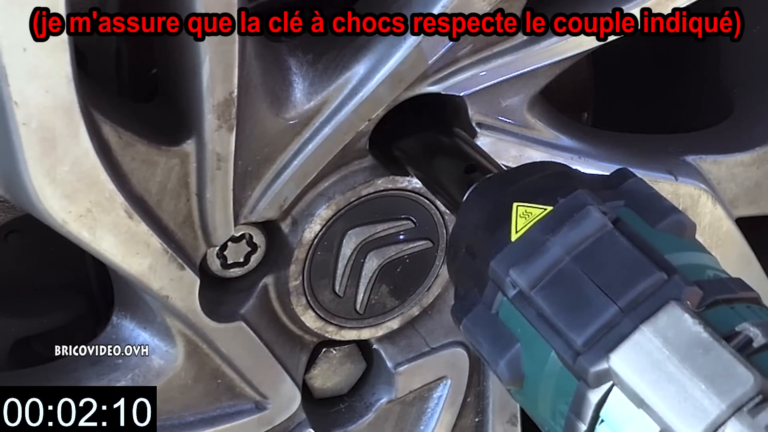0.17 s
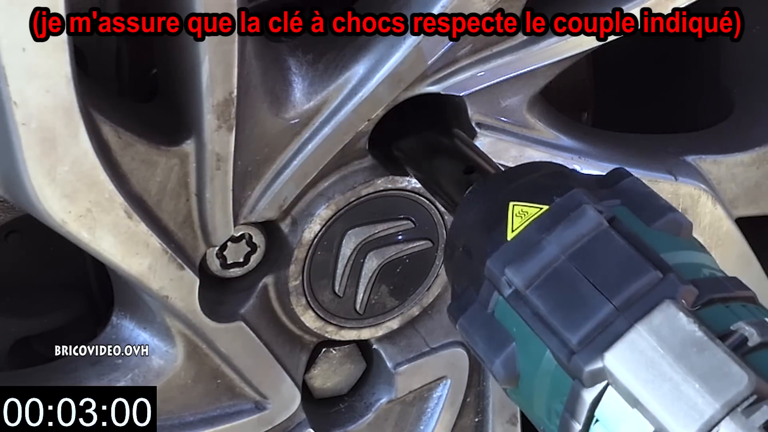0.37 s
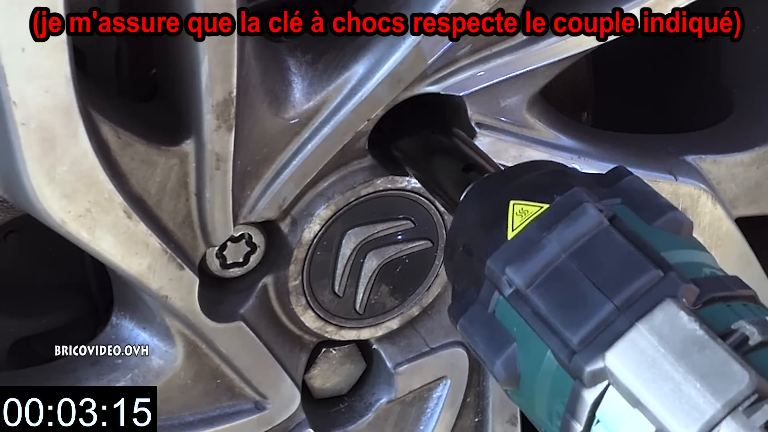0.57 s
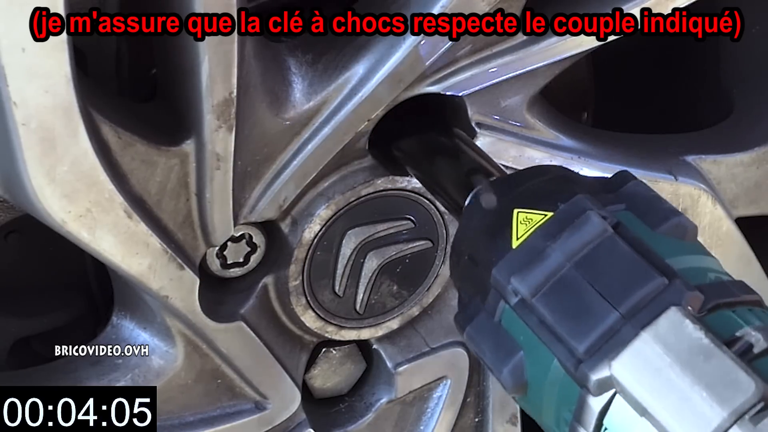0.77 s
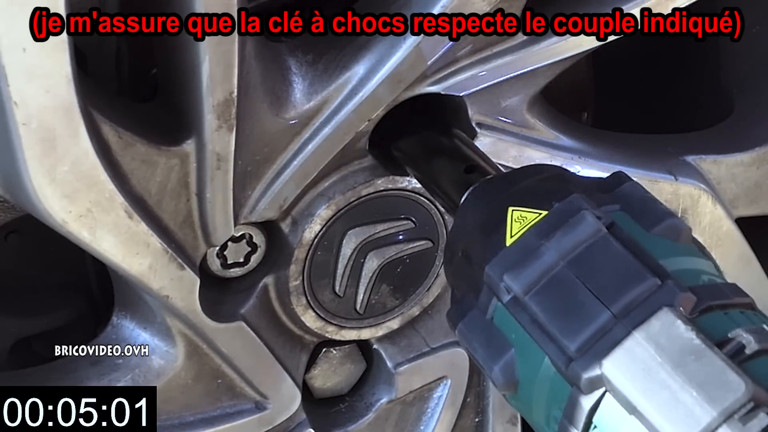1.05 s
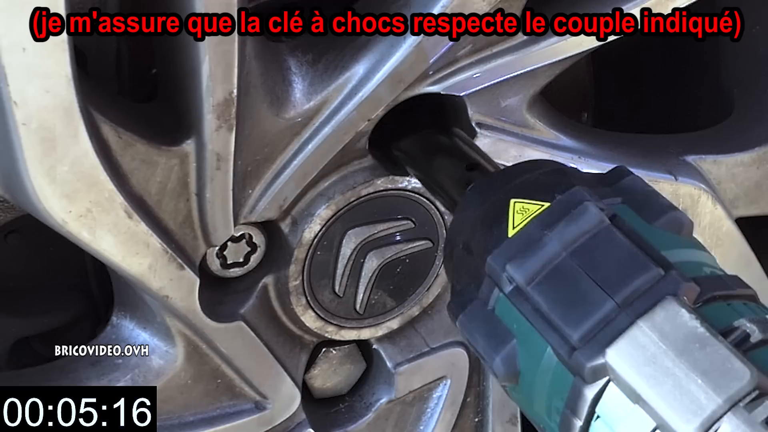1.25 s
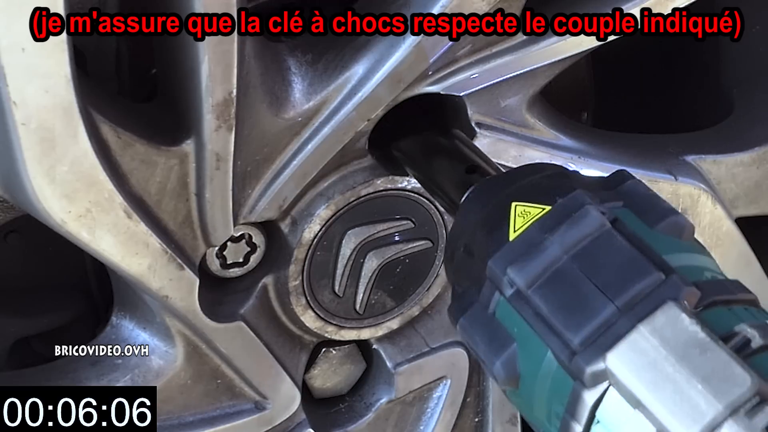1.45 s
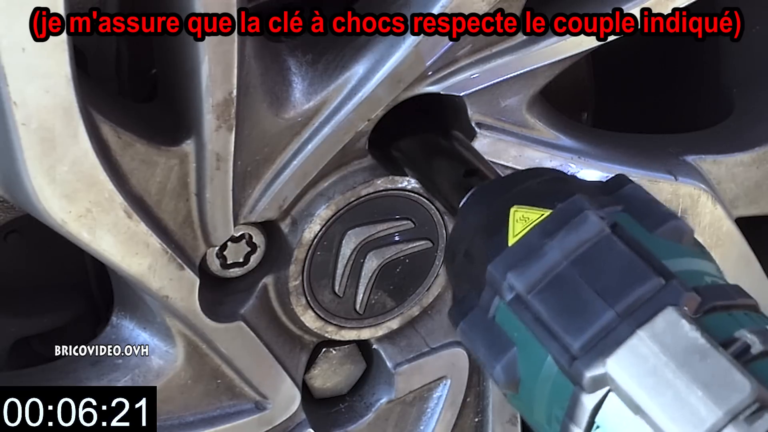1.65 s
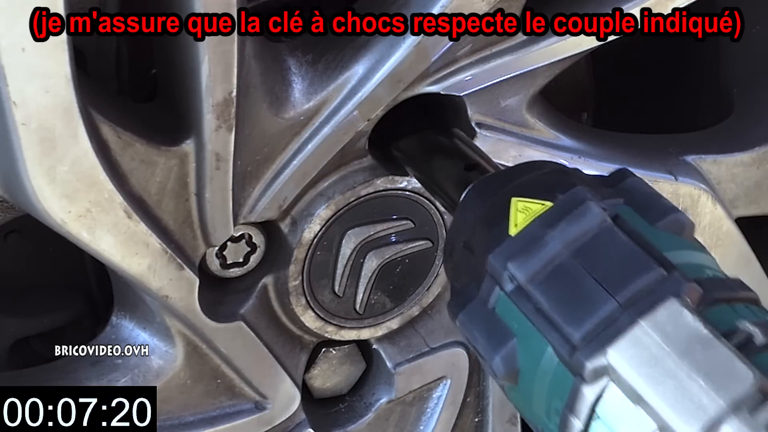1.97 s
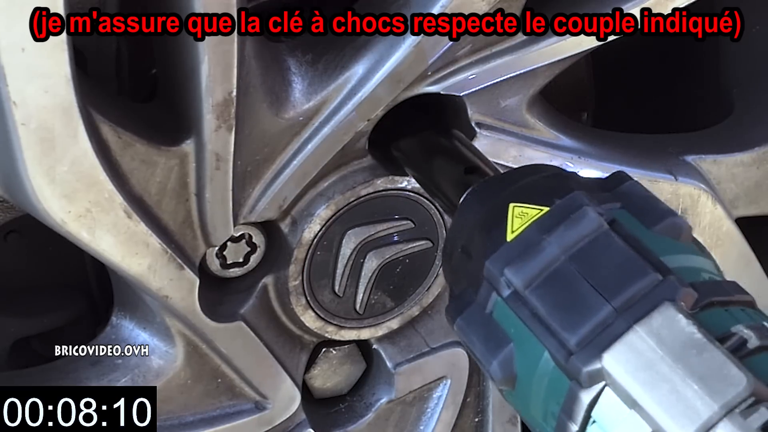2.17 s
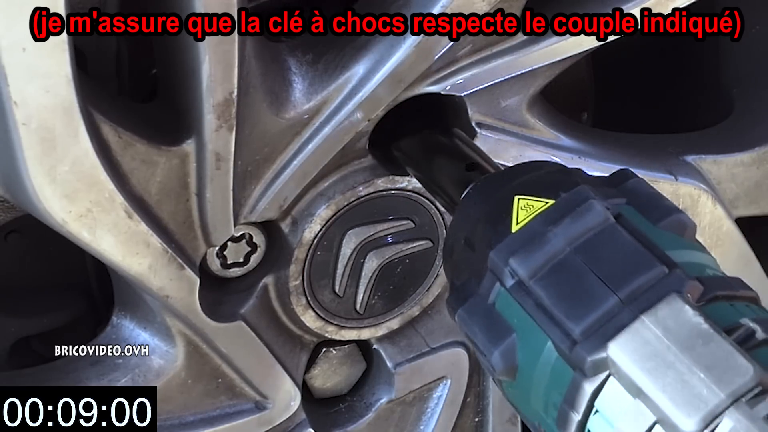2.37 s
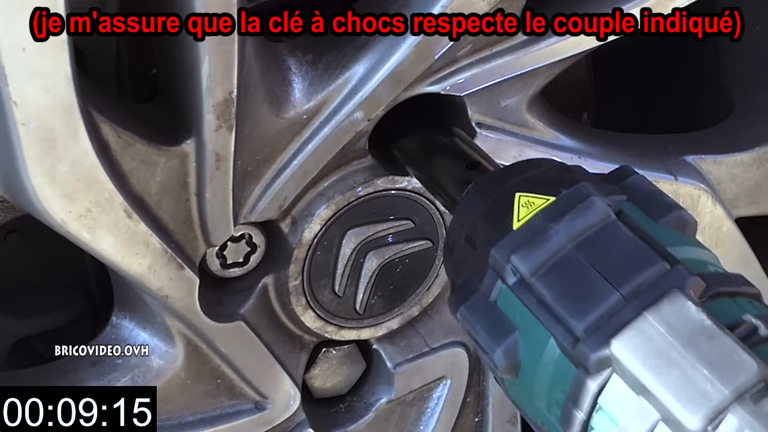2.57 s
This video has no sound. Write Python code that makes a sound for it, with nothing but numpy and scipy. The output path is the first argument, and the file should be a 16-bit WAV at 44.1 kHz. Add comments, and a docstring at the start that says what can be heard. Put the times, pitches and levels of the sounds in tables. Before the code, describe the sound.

An impact wrench tightens a nut on an alloy wheel, heard up close. Its rapid steel blows crack and ring continuously over a faint hum from the tool, easing a little, then holding steady, with brief reflections from nearby walls.

```python
"""A hard metallic rattle, about 61 blows a second: a cordless impact wrench on the lug nut of an alloy wheel,
close to the microphones. Every hammer cycle is four steel-on-steel contacts: each cracks, rings the
socket and wheel, and rattles the housing. Underneath, the wheel shudders and the tool's body hums.
The blows soften over the first second; nearby walls add a short wash over faint background air."""
import sys
import numpy as np
from scipy import signal
from scipy.fft import rfft, irfft, next_fast_len
from scipy.io import wavfile

SR = 44100
rng = np.random.default_rng(int(sys.argv[2]) if len(sys.argv) > 2 else 0)


def materialize(psi):
    """Save the field psi as 16-bit PCM at rate SR to the path in sys.argv[1].

    A 1-D psi becomes a single channel; in a 2-D psi each row is a channel.
    """
    bounded = np.clip(np.atleast_2d(psi).T, -1, 1)
    quanta = np.round(bounded * 32767).astype(np.int16)
    wavfile.write(sys.argv[1], SR, quanta)


N = 119070

# the four contacts of a hammer cycle (delay from the main blow [ms], level [dB], scatter [dB],
# share of the force changes [ratio], clank [dB], bright edge [dB], housing [dB])
CONTACT_PATTERN = [(-4.85, -4.9, 2.2, .8, -2.5, -3.5, -7), (-2.7, -1.2, 1.7, 1.1, 2.5, 0, -1),
                   (.55, -.3, 1.9, 1.1, -2, .5, 0), (5.17, -3.8, 1.7, .45, -1.5, -1.5, -1.5)]
JITTER_MS, LOOSEN_PER_S = .13, .35  # the timing of the contacts loosens as the nut seats


def hammer(start_turns=-.41, cycle_jitter_ms=.09, uneven_ms=.28, uneven_db=.7):
    """The spinning hammer strikes: time [s], force [dB] per cycle; time, level, clank per contact."""
    # hammer speed (time [s], rate [blows per second])
    speed = [(0.0, 60.67), (0.3, 61.22), (0.5, 60.49), (0.8, 61.25), (1.1, 61.48), (1.28, 61.92),
             (1.5, 61.17), (1.9, 61.58), (2.15, 61.23), (2.5, 61.82), (2.7, 62.27)]
    # force of the hammering (time [s], level [dB])
    force_curve = [(0, -26.1), (.5, -26.3), (.72, -27.5), (.9, -28.1), (1.15, -29.7), (1.55, -28.8),
                   (1.95, -29.9), (2.1, -29.4), (2.3, -30.6), (2.48, -29.3), (2.7, -30)]
    # blows that land squarely (time [s], extra level [dB], clank [dB])
    square_blows = [(.0902, 7, -3), (.169, 2, 6), (.2665, 2, 3.5), (.3192, 5, -3), (.8279, 4, -2),
                    (.9098, 4, -2), (1.2188, 4, -3), (1.462, 4, -6), (1.7394, 2.5, -3), (2.0647, 4, -3),
                    (2.0972, 4.5, -2), (2.1299, 4.5, -3), (2.2282, 3.5, -3), (2.3741, 2.3, -2)]
    t = np.arange(N) / SR
    turns = start_turns + np.cumsum(np.interp(t, *np.transpose(speed))) / SR
    cycle = np.arange(int(turns[-1]) + 1)
    chance = rng.standard_normal((len(cycle), 9))
    blow = np.interp(cycle, turns, t) + cycle_jitter_ms * chance[:, 0] / 1000
    force = np.interp(blow, *np.transpose(force_curve))
    delay_ms, db, scatter_db, share, clank_db, _, _ = np.transpose(CONTACT_PATTERN)
    late_ms = delay_ms + JITTER_MS * (1 + LOOSEN_PER_S * blow[:, None]) * chance[:, 1:5]
    scatter = scatter_db * np.minimum(chance[:, 5:], 1)
    level = db + share * (force - force.mean())[:, None] + scatter
    clank = clank_db - scatter / 2
    lug = (-1.) ** cycle  # two lugs take turns: the first contact alternates in time and strength
    late_ms[:, 0] += uneven_ms * lug
    level[:, 0] -= uneven_db * lug
    times = blow[:, None] + late_ms / 1000
    for when, extra_db, square_clank_db in square_blows:
        row, contact = np.unravel_index(np.argmin(abs(times - when)), times.shape)
        level[row, contact] = force[row] - force.mean() + extra_db
        clank[row, contact] = square_clank_db
    return blow, force, times, level, clank


def cracks(times, level, alike=0.25, rise_s=.0005, spike_s=.00024, ring_s=.0013, ring_db=1):
    """Each contact scrapes in, spikes and leaves a dense ring, partly the same from blow to blow."""
    t = np.arange(-SR // 1000, SR // 100) / SR
    noise = rng.standard_normal((times.size + 1, len(t)))
    grain = alike * noise[0] + np.sqrt(1 - alike ** 2) * noise[1:]
    spike = np.exp(-abs(t) / spike_s) * (t >= 0)
    ring = amp(ring_db) * np.exp(-np.where(t < 0, -t / rise_s, t / ring_s))
    shapes = grain * (spike + ring)
    shapes /= np.linalg.norm(shapes, axis=1, keepdims=True)
    return place(times.ravel() + t[0], shapes * amp(level.reshape(-1, 1)))


def steel(times, level, clank):
    """Steel on steel, up close: each contact mixes crack, clank and edge, and rings socket and wheel."""
    # colours of the steel's crack, the socket's clank and the bright edge (frequency [Hz], level [dB])
    crack_colour = [(200, -21), (5000, -35), (7400, -9), (7850, 2), (9700, 2.5), (10600, 2), (11200, -3.5),
                    (12000, -2.5), (14000, -18.5)]
    clank_colour = [(200, -32), (1500, -14.5), (2300, -18.5), (2900, -9), (3500, -15.5), (4300, -7),
                    (5100, 0.5), (6300, 1.5), (7000, -1.5), (7600, -22.5), (9000, -37.5)]
    edge_colour = [(200, -67), (8000, -33), (11500, -8), (12600, 2), (13600, 4), (14800, 1), (15600, -5.5)]
    # drift of the clank and of the bright edge (time [s], level [dB])
    clank_curve = [(0, 0.5), (.35, 0.5), (.52, 1), (.7, -0.5), (1.25, 0.5), (1.42, -2), (1.57, 1.8),
                   (1.67, -1), (1.77, -0.5), (1.87, 2), (2.0, -0.2), (2.33, -1.5), (2.46, 0.5), (2.6, -.7)]
    edge_curve = [(0, -3.5), (.35, -3.5), (.52, -0.7), (.8, -1.5), (1.0, -1), (1.8, -1.5), (2.02, -2),
                  (2.2, -1.7), (2.7, 0)]
    # ringing of socket and wheel (frequency [Hz], width [Hz], level [dB])
    ring_modes = [(1959, 110, -8), (2598, 140, -9), (2975, 120, -4), (3627, 28, -1), (5720, 140, -2),
                  (6330, 55, 2), (8070, 70, 1), (9700, 170, 4), (10626, 60, 2), (10870, 35, 0),
                  (13476, 180, -1)]
    clank = clank + np.interp(times, *np.transpose(clank_curve))
    edge = np.transpose(CONTACT_PATTERN)[-2] + np.interp(times, *np.transpose(edge_curve))
    return (amp(-3) * unit(coloured(cracks(times, level), crack_colour))
            + amp(-9.5) * unit(coloured(cracks(times, level + clank), clank_colour))
            + amp(-4.5) * unit(coloured(cracks(times, level + edge), edge_colour))
            + amp(-12) * unit(resonate(cracks(times, level, alike=0), ring_modes)))


def housing(times, force, rise_s=0.00061, decay_s=.0021, follow=1.23, scatter_db=1.5):
    """The gear housing rattles after each contact, duller, longer and steadier than the steel."""
    # colour of the rattle (frequency [Hz], level [dB])
    rattle_colour = [(100, -30), (300, -18), (650, -6), (1050, -3.5), (1400, -13.5), (1750, -1),
                     (2200, 3.5), (3000, -1.5), (4200, 3), (7000, -2.5), (15000, -81)]
    t = np.arange(SR // 60) / SR
    scatter = scatter_db * rng.standard_normal(times.shape)
    db = np.transpose(CONTACT_PATTERN)[-1] + follow * force[:, None] + scatter
    envelope = (1 - np.exp(-t / rise_s)) * np.exp(-t / decay_s)
    rattles = amp(db).reshape(-1, 1) * envelope * rng.standard_normal((times.size, len(t)))
    return unit(coloured(place(times.ravel(), rattles), rattle_colour))


def recoil(times, level, decay_s=0.0033, follow=0.14):
    """The wheel shudders low after each contact, in opposite phase at the two microphones."""
    # colour of the shudder (frequency [Hz], level [dB])
    shudder_colour = [(40, -16), (120, -12), (200, -6), (270, 0), (400, 0.5), (600, 0), (800, -2.5),
                      (1100, -7), (2000, -30), (6000, -51)]
    t = np.arange(SR // 30) / SR
    envelopes = np.exp(-t / decay_s) * amp(follow * level.reshape(-1, 1))
    shudders = envelopes * rng.standard_normal((times.size, len(t)))
    return unit(coloured(place(times.ravel(), shudders), shudder_colour)) * np.array([[1], [-1]])


def rim(blow, force, scatter_db=2, uneven_ms=0.094, uneven_ms_per_s=.075):
    """The first contact of each cycle takes up the slack and knocks the wheel's low modes."""
    # low modes of the wheel (frequency [Hz], width [Hz], level [dB])
    rim_modes = [(523, 14, 3.5), (552, 20, -4), (581, 18, 0), (612, 22, -2), (672, 18, 3), (710, 22, 4),
                 (860, 24, -2), (1000, 450, -4)]
    chance = rng.standard_normal((len(blow), 2))
    lug = (-1.) ** np.arange(len(blow))
    limp_ms = (uneven_ms + uneven_ms_per_s * blow) * lug  # the two lugs strike more and more unevenly
    jitter_ms = JITTER_MS * (1 + LOOSEN_PER_S * blow) * chance[:, 0]
    late_ms = CONTACT_PATTERN[0][0] + limp_ms + jitter_ms
    knocks = amp(force - force.mean() + scatter_db * chance[:, 1])
    return unit(resonate(place(blow + late_ms / 1000, knocks[:, None]), rim_modes))


def body(blow, force, follow=1.2, scatter_db=2.5, fade_db_per_s=1.1):
    """Each cycle's second contact kicks the tool's body, which hums on multiples of the hammer rate."""
    # resonances of the tool's body (frequency [Hz], width [Hz], level [dB])
    body_modes = [(246, 22, 2.3), (306, 22, -4), (368, 22, 2), (430, 26, -10)]
    db = follow * (force - force.mean()) - fade_db_per_s * blow  # the hum fades as the nut seats
    kicks = amp(db + scatter_db * rng.standard_normal(len(force)))
    kick_times = blow + CONTACT_PATTERN[1][0] / 1000
    return unit(resonate(place(kick_times, kicks[:, None]), body_modes))


def wash(strikes, rise_s=0.0012, spokes_s=0.0033, spokes_db=9, walls_t60_s=0.16):
    """Diffuse answer, unrelated at each microphone: quick from the spokes, longer from the walls."""
    # colour of the reflections (frequency [Hz], level [dB])
    wash_colour = [(40, -8.5), (130, -7.5), (350, -7), (650, -5.5), (1450, -3), (2200, -1), (2800, 1.5),
                   (5600, 6), (7300, 4.5), (9200, 8.5), (13600, 4.5), (15600, 5.5)]
    t = np.arange(SR // 2) / SR
    walls = 1000. ** (-t / walls_t60_s)
    spokes = amp(spokes_db) * np.exp(-t / spokes_s)
    tail = (walls + spokes) * (1 - np.exp(-t / rise_s))
    envelope = np.sqrt(abs(signal.fftconvolve(strikes ** 2, tail ** 2)[:N]))
    return unit(coloured(envelope * rng.standard_normal((2, N)), wash_colour))


def air():
    """Still air around the microphones: a steady, soft noise."""
    # colour of the background (frequency [Hz], level [dB])
    air_colour = [(20, -2), (60, -3), (200, -10), (1000, 11), (15000, -40)]
    return unit(coloured(rng.standard_normal((2, N)), air_colour))


def amp(db):
    """Decibels to gain."""
    return 10 ** (np.asarray(db) / 20)


def unit(x):
    """Scale to rms 1."""
    return x / np.sqrt(np.mean(x ** 2) + 1e-20)


def pan(db):
    """Gains at the two microphones: left up by db, right down by db."""
    return amp(np.array([[db], [-db]]))


def filtered(x, response):
    """Filter x by a complex response of frequency."""
    size = 2 * next_fast_len(N // 2 + SR // 4)
    hz = np.fft.rfftfreq(size, 1 / SR)
    return irfft(rfft(x, size) * response(hz), size)[..., :N]


def coloured(x, points):
    """Causal filter through (frequency [Hz], level [dB]) points."""
    def response(hz):
        point_hz, db = np.transpose(points)
        gain = amp(np.interp(np.log(hz + 1), np.log(point_hz + 1), db))
        cepstrum = irfft(np.log(gain))
        half = len(cepstrum) // 2
        cepstrum[1:half] *= 2  # fold to minimum phase
        cepstrum[half + 1:] = 0
        return np.exp(rfft(cepstrum))
    return filtered(x, response)


def resonate(x, modes):
    """Bank of (frequency [Hz], width [Hz], level [dB]) resonances that start together."""
    def response(hz):
        return sum(amp(db) * 1j * hz * width / (centre ** 2 - hz ** 2 + 1j * hz * width)
                   for centre, width, db in modes)
    return filtered(x, response)


def place(times, shapes):
    """Sum one short shape per row at its time."""
    index = np.round(times * SR).astype(int)[:, None] + np.arange(shapes.shape[1])
    inside = (index >= 0) & (index < N)
    return np.bincount(index[inside], shapes[inside], N)


def scene():
    """The wrench close up and near the centre, its low sounds to the left, walls and air behind."""
    blow, force, times, level, clank = hammer()
    wrench = (pan(-0.45) * steel(times, level, clank)
              + amp(-15.5) * housing(times, force)
              + amp(-33.5) * pan(2.5) * body(blow, force)
              + amp(-25.5) * pan(3) * rim(blow, force)
              + amp(-23) * pan(2.5) * recoil(times, level))
    background = amp(-67) * air()
    reflections = amp(-4.5) * wash(cracks(times, level))
    return amp(force.mean()) * (wrench + reflections) + background


def record(dry):
    """The recorder keeps nothing above its band limit."""
    return filtered(dry, lambda hz: hz < 15830)


dry = scene()
out = record(dry)
materialize(out)
```